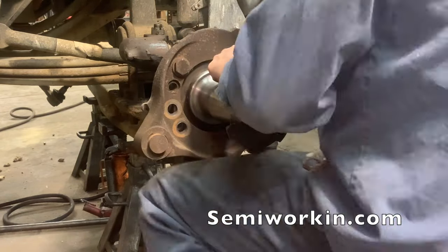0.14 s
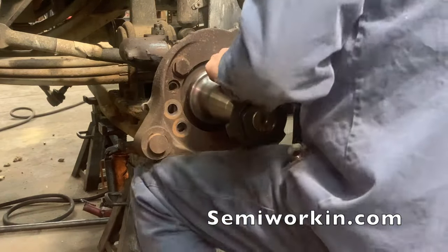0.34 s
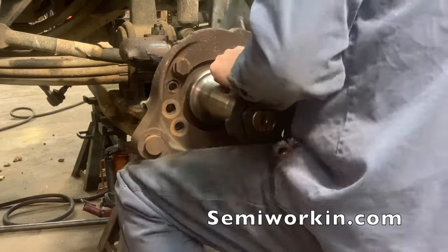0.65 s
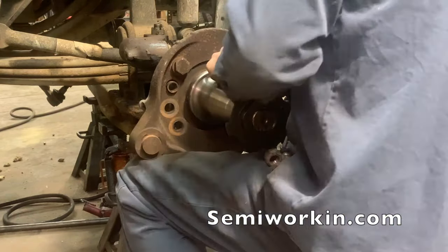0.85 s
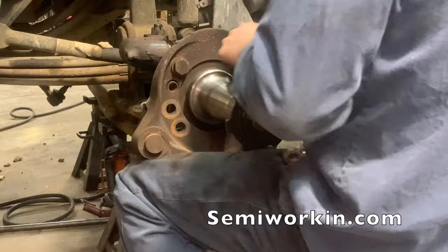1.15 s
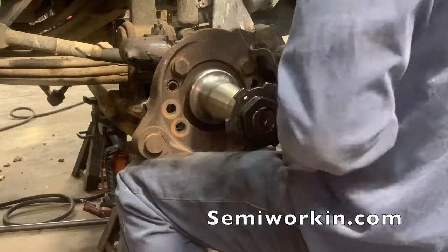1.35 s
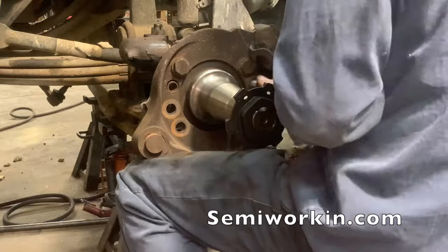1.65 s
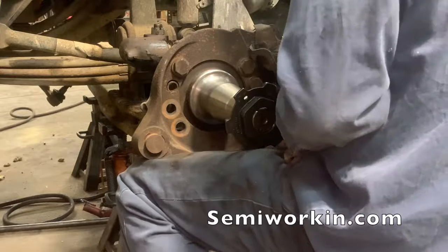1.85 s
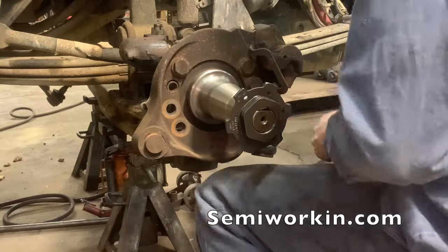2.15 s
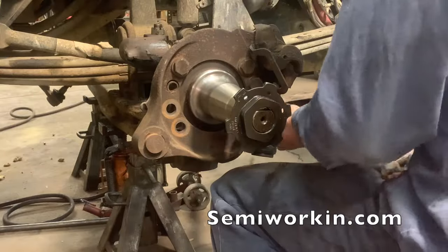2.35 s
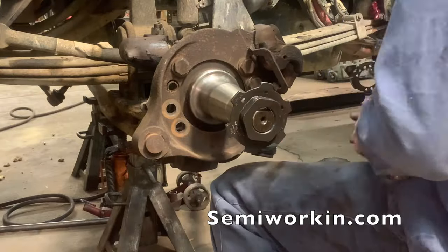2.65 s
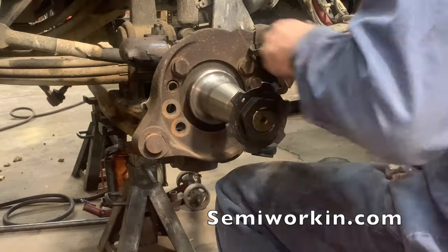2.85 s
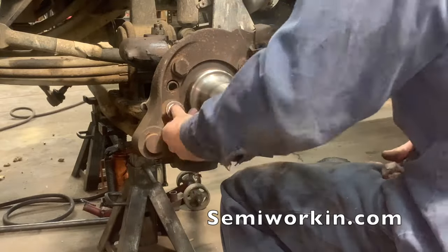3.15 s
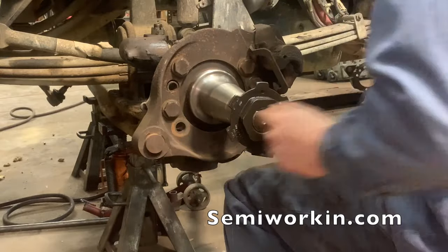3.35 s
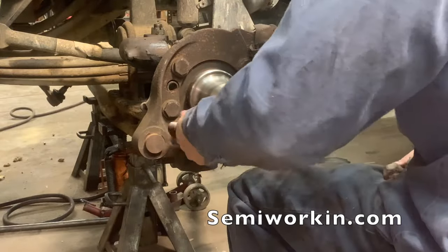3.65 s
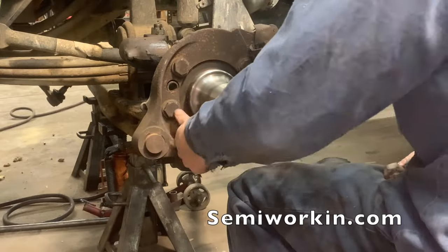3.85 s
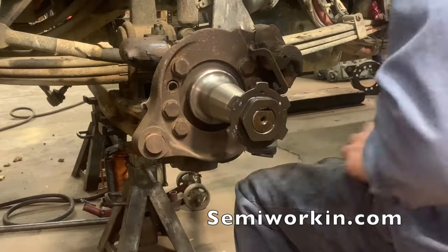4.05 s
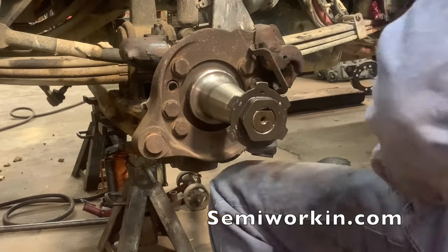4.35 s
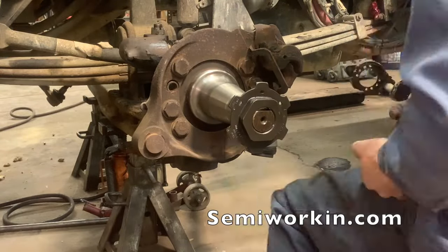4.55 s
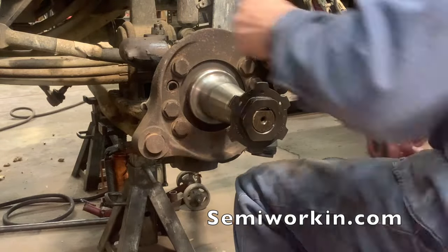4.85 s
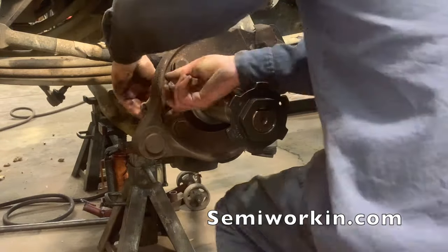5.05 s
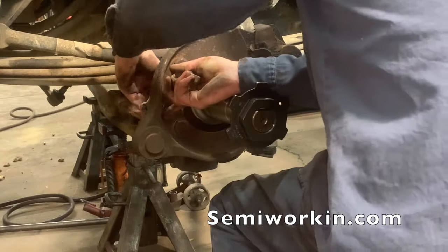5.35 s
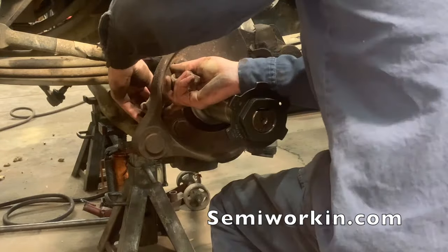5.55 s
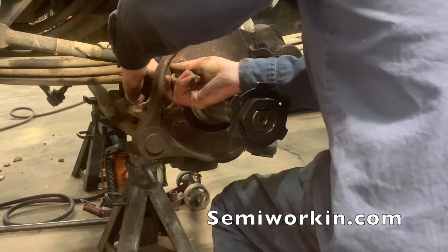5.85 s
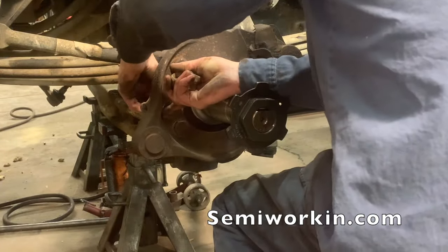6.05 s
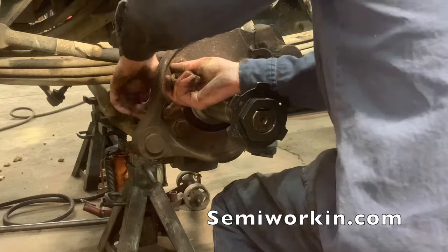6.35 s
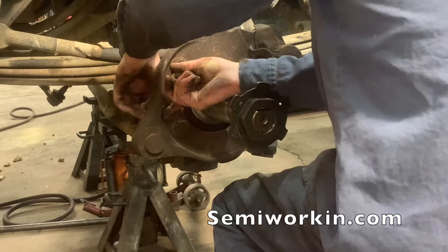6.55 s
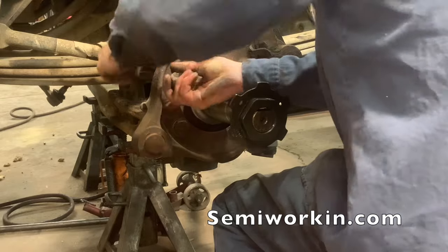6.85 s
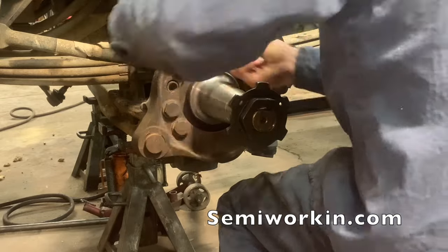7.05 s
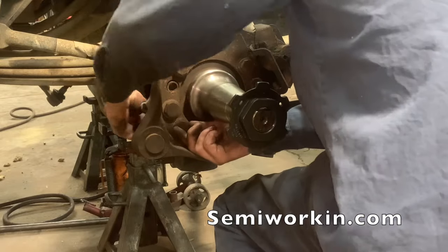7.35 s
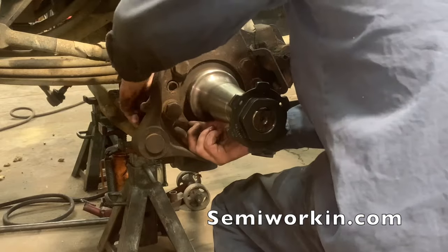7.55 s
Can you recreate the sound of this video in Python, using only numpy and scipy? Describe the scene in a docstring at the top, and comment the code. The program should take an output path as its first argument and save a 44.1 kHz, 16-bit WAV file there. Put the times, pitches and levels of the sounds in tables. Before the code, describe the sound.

A close stereo microphone in a workshop with a short, dense echo; deep wandering rumble, faint smooth hiss and tiny finger taps run throughout. At 0 seconds the tail of an air blip vanishes as steel drags and knocks dully until about 0.6. Bolts clink at 0.7 and snap at 0.8, with low axle booms and muffled clothing movement through 1.2. More bright clinks come around 1.7; a distant motor spins up from 1.75, steadies, and coasts down near 2.9. Another scrape at 2.0 leads to clinks around 2.4. From 2.9 to 3.9 bolts drop, slide and snap into holes, with slight wrench knocks at 3.6 and 3.95. Then it is quieter, with soft touches and a boom at 4.4. A short air-wrench burst hits at 4.9, with a soft rattle and a snap at 5.1. Faint thread ticking follows at 5.3-5.5 and 6.05-6.4. A weaker wrench burst with hammer blows comes at 7.1-7.2, then light touches to 7.5.

```python
"""A blip of air dies away at once while steel drags and knocks dully on a truck axle; bumps make the axle boom.
Loose bolts clink in the hand, and a distant motor speeds up and later coasts down.
Bolts then drop into the flange, sliding and snapping; an air impact wrench blips, threads tick and it blips again.
Contacts are short, soft-edged noise bursts ringing damped steel modes; the wrench is pulsed exhaust and blows.
Faint finger taps, a deep workshop rumble and a smooth hiss last throughout."""
import sys
import numpy as np
from scipy import signal
from scipy.fft import rfft, irfft, next_fast_len
from scipy.io import wavfile
from scipy.ndimage import uniform_filter1d

SR = 44100
rng = np.random.default_rng(int(sys.argv[2]) if len(sys.argv) > 2 else 0)


def put_to_file(sound):
    """Save the sound as 16-bit audio at rate SR, in the file named by the first command-line argument."""
    columns = np.atleast_2d(sound).T  # one column per channel
    safe = np.clip(columns, -1, 1)
    whole_steps = np.round(safe * 32767)
    wavfile.write(sys.argv[1], SR, whole_steps.astype(np.int16))


N = 339129
TIME = np.arange(N) / SR

# Levels of contacts are short-time peaks of their middle band; treble is relative to that.
# loose bolts meet in the hand: (time [s], level [dB], relative treble [dB])
HAND_CLINKS = [(0.699, -39, -3), (1.666, -32.5, -7), (1.676, -40, -1.5), (1.703, -35.5, -5.5),
               (1.722, -49, 8), (2.299, -48, -2), (2.327, -47.5, -18), (2.359, -50, -19.5),
               (2.389, -34, -9), (2.425, -36, -22), (2.437, -39.5, -7)]
# a bolt drops into its hole: (time [s], level [dB], relative treble [dB])
BOLT_SEATINGS = [(2.926, -38.5, 1), (3.168, -37.5, -17), (3.19, -45.5, 2.5), (3.578, -38.5, -3),
                 (3.738, -47.5, -4), (3.79, -51, -4), (3.913, -40, -3)]
# a bolt tip snaps against steel: (time [s], level [dB], relative treble [dB])
TIP_SNAPS = [(0.811, -39, 2), (0.821, -36.5, 8.5), (1.539, -52.5, 7), (2.453, -49.5, 6.5),
             (3.035, -40.5, 1), (5.114, -42, 2.5), (6.625, -58.5, 3.5)]
# dull knocks on the axle, before panning: (time [s], level [dB])
AXLE_KNOCKS = [(0.005, -49), (0.047, -60), (0.107, -57), (0.241, -58.5), (0.277, -63), (0.41, -71),
               (0.554, -67.5), (0.655, -56.5), (0.695, -59), (0.815, -54), (1.101, -68), (1.759, -67),
               (2.138, -56.5)]
# light touches of a bolt on the flange: (time [s], level [dB])
FLANGE_TOUCHES = [(1.14, -56.5), (1.348, -58), (1.476, -63.5), (2.176, -60), (4.176, -63), (4.296, -62),
                  (4.565, -63), (6.869, -56.5), (7.335, -61), (7.366, -58.5), (7.53, -59.5)]
# resonances of a bolt held loosely: (frequency [Hz], level [dB])
LOOSE_BOLT_MODES = [(1168, -7.5), (1976, -3.5), (2929, -8), (3198, 8), (3965, 5), (4075, 4), (4519, 3),
                    (5725, 3), (6345, -1), (7440, 2.5), (8716, 3), (9200, 3), (12700, -3.5)]
# resonances of a bolt in its hole: (frequency [Hz], level [dB])
SEATED_BOLT_MODES = [(1230, -18), (1920, 1.5), (2300, -4), (3250, -3.5), (3900, -0.5), (4060, 0), (4450, 0),
                     (5270, -5.5), (7335, 1), (7550, -2.5), (8500, -4), (11350, -9), (13500, -24)]
# resonances of a bolt tip: (frequency [Hz], level [dB])
BOLT_TIP_MODES = [(1230, -8), (2250, -3.5), (4450, -2), (6250, 0.5), (8620, -4.5), (10000, -7),
                  (12300, -10), (13650, 2), (14300, 2)]
# resonances of the axle: (frequency [Hz], level [dB])
AXLE_MODES = [(670, -15), (943, 3.5), (1055, 4), (1180, -4.5), (1370, -22), (1650, 1)]
# resonances of a bolt at its thread: (frequency [Hz], level [dB])
THREAD_MODES = [(1980, 5), (2250, 4), (3700, -7), (4400, -0.5)]
# after a seating or snap the bolt rocks back once, softer and duller
ROCK_S, ROCK_DB, ROCK_TREBLE_DB = 0.062, -19, -8.5
BOUNCE_S, BOUNCE_DB = 0.014, -7.5  # each knock bounces once


def handwork():
    """Impact excitation: bolts and axle ring in their damped modes at each clink, drop, snap, knock and tick."""
    seatings = rebounding(BOLT_SEATINGS, ROCK_S, ROCK_DB, ROCK_TREBLE_DB)
    snaps = rebounding(TIP_SNAPS, ROCK_S, ROCK_DB, ROCK_TREBLE_DB)
    bounces = [(s + BOUNCE_S, db + BOUNCE_DB) for s, db in AXLE_KNOCKS]
    knocks = alike(AXLE_KNOCKS + bounces, treble_db=-4)
    ticks = alike(FLANGE_TOUCHES + thread_ticks() + fidgets(), treble_db=-9)
    thuds = contacts(knocks, AXLE_MODES, bass_db=12, rise_t60=0.041, fall_t60=0.035,
                     ring_db=-13.5, ring_t60=0.034)
    return (contacts(HAND_CLINKS, LOOSE_BOLT_MODES, bass_db=-15.5, rise_t60=0.045, fall_t60=0.053,
                     ring_db=-14.0, ring_t60=0.031)
            + contacts(seatings, SEATED_BOLT_MODES, bass_db=-14, rise_t60=0.034, fall_t60=0.062,
                       ring_db=-8.5, ring_t60=0.013)
            + contacts(snaps, BOLT_TIP_MODES, bass_db=-12.5, rise_t60=0.037, fall_t60=0.036,
                       ring_db=-11.0, ring_t60=0.012)
            + to_right(thuds, pan_db=3, lag_s=0.00013)
            + contacts(ticks, THREAD_MODES, bass_db=-7, rise_t60=0.042, fall_t60=0.046,
                       ring_db=-13.5, ring_t60=0.0086))


# fingers spin a bolt in: (start [s], end [s], time between ticks [s], mean tick level [dB])
THREAD_TURNS = [(5.281, 5.531, .054, -66.5), (6.052, 6.42, .082, -67)]
TICK_SCATTER_DB = 3


def thread_ticks():
    """Periodic excitation: a turning thread catches at an even pace, each catch with its own strength."""
    return [(s, db + TICK_SCATTER_DB * rng.standard_normal())
            for start, end, period, db in THREAD_TURNS for s in np.arange(start, end, period)]


FIDGETS, FIDGET_DB = 45, -73  # number of taps, mean level


def fidgets():
    """Random point process: faint taps of fingers and sleeves scatter evenly over the whole scene."""
    return [(where * N / SR, FIDGET_DB + 5 * (strength - 0.5))
            for where, strength in rng.random((int(FIDGETS), 2))]


# Levels of rubbing are gains of the push, before slip unevenness and the 6 dB cut that all rubbing shares.
# steel dragged over steel: (start [s], end [s], level at start [dB], level at end [dB])
STEEL_SCRAPES = [(0, .29, -53, -57), (.3, .55, -63, -67), (1.94, 2.17, -57.5, -53)]
# a soft rattle after the second blip: (start [s], end [s], level at start [dB], level at end [dB])
SOFT_RATTLE = [(4.98, 5.3, -54, -61.5)]
# a bolt shank slides in its hole: (start [s], end [s], level at start [dB], level at end [dB])
SHANK_SLIDES = [(3.07, 3.21, -58, -53), (3.67, 3.83, -68, -53)]
GRATE_DB = -77.5  # push of the grating threads, before its long edges


def scraping():
    """Friction excitation: uneven slips ring the parts as steel drags, slides and grates in its thread, and a
    soft rattle follows the second blip."""
    turning = [(start, end, GRATE_DB, GRATE_DB) for start, end, _, _ in THREAD_TURNS]
    rattle_modes = [(960, 2), (1070, -4), (1170, -10)]  # (frequency [Hz], level [dB])
    drag = rub(stroke(STEEL_SCRAPES, edge_s=0.021), AXLE_MODES, top_hz=2110, ring_db=-17, uneven_db=4.0)
    rattle = rub(stroke(SOFT_RATTLE, edge_s=0.06), rattle_modes, top_hz=1400, ring_db=-10, uneven_db=3.0)
    sliding = rub(stroke(SHANK_SLIDES, edge_s=0.025), SEATED_BOLT_MODES,
                  top_hz=3480, ring_db=-17.5, uneven_db=3.5)
    # the edges outlast the turns, so the grating only swells and sinks
    grating = rub(stroke(turning, edge_s=0.6), THREAD_MODES, top_hz=4000, ring_db=-6.0, uneven_db=5.0)
    balance_db = np.array([[-1.2], [1.2]])
    return (drag + rattle + sliding + grating) * undb(-6 + balance_db)


# trigger pulls, before panning: (time [s], time held [s], level [dB], run-down t60 [s])
TRIGGER_PULLS = [(-0.02, 0.027, -52, 0.45), (4.894, 0.054, -40.5, .3), (7.076, 0.076, -48, 0.09)]
# spectrum of the vented air: (frequency [Hz], level [dB])
EXHAUST_COLOUR = [(400, -11.5), (740, -24), (980, -2), (1290, -2.5), (1930, -18.5), (2700, -14),
                  (3200, -24), (4950, -9), (6400, -18), (8300, -14.5), (12100, -9), (15500, -25)]
# the hammer of the wrench strikes, before panning: (time [s], level [dB])
WRENCH_BLOWS = [(3.568, -51.5), (3.953, -49.5), (4.906, -46.5), (5.0, -56), (7.082, -49.5), (7.132, -52),
                (7.152, -51.5), (7.209, -46)]
# resonances of the wrench: (frequency [Hz], level [dB])
WRENCH_MODES = [(1040, 0), (1230, 11), (1310, 11.5), (1450, -7), (5020, -2.5), (8400, 2), (12000, 5)]
PUFF_HZ = 125  # mean rate of the air puffs


def wrench():
    """Amplitude-modulated flow noise: rotor vanes vent air in puffs; hammer blows ring the body, to the right."""
    flow = sum(undb(db) * np.clip((TIME - s) / 0.02, 0, 1) * fade(TIME - s - held, t60)
               for s, held, db, t60 in TRIGGER_PULLS)
    turn = np.cumsum(PUFF_HZ * (1 + 0.109 * walk(60))) / SR
    puffs = 1 + 0.1 * np.cos(2 * np.pi * turn)
    exhaust = noise(EXHAUST_COLOUR, 0.32) * flow * puffs
    blows = contacts(alike(WRENCH_BLOWS, treble_db=6.0), WRENCH_MODES, bass_db=6.5,
                     rise_t60=0.036, fall_t60=0.035, ring_db=-11.0, ring_t60=0.017)
    return to_right(exhaust + blows, pan_db=2.5, lag_s=0.00015)


# bumps of arm and knee on the axle: (time [s], level before envelope and balance [dB], frequency [Hz])
AXLE_BUMPS = [(0.561, -31.5, 119.3), (0.66, -30, 125.6), (0.87, -32, 113.4), (1.148, -28.5, 147),
              (1.724, -30, 111), (3.776, -35.5, 137), (4.359, -29.5, 132.5), (6.65, -40, 187)]
# one low mode of the flange: (time [s], frequency [Hz], level before envelope and balance [dB], t60 [s])
FLANGE_HUM = (3.168, 400, -45, .24)


def bumps():
    """Damped resonance: soft, heavy pushes make the axle boom, and one bolt sets the flange humming."""
    out, t = np.zeros((2, N)), np.arange(SR // 3) / SR
    balance = undb(np.array([[-0.6], [0.6]]))
    for s, db, hz in AXLE_BUMPS:
        boom = (1 - fade(t, 0.038)) * fade(t, 0.15) * np.sin(2 * np.pi * hz * t)
        add(out, s - 0.004, undb(db) * boom * balance)
    s, hz, db, t60 = FLANGE_HUM
    hum = (1 - fade(t, 0.018)) * fade(t, t60) * np.sin(2 * np.pi * hz * t)
    add(out, s, undb(db) * hum * balance)
    return out


# the worker shifts his weight: (time [s], time to fall to 1/e [s], bass level [dB], low-mid level [dB])
WEIGHT_SHIFTS = [(0.01, 0.053, -44.5, -43), (0.167, 0.14, -60, -54.5), (0.726, 0.2, -46, -55.5),
                 (1.16, 0.037, -43.5, -50.5), (2.086, 0.069, -56, -51.5), (3.792, .06, -58, -55)]
# spectrum of muffled low-mid noise: (frequency [Hz], level [dB])
LOW_MID_COLOUR = [(170, 3.5), (240, 2), (330, -4), (450, -7.5), (700, -22), (1200, -30.5)]


def shifting():
    """Low-passed friction noise: heavy clothes and limbs make a muffled swell whenever the worker moves."""
    swells = [(np.exp(-((TIME - s) / half) ** 2), bass_db, low_mid_db)
              for s, half, bass_db, low_mid_db in WEIGHT_SHIFTS]
    bass_gain = sum(swell * undb(db) for swell, db, _ in swells)
    low_mid_gain = sum(swell * undb(db) for swell, _, db in swells)
    bass = noise([(90, -5), (135, 0), (200, -8)], 0.95) * bass_gain
    return bass + noise(LOW_MID_COLOUR, 0.84) * low_mid_gain


# when the motor is heard, before flutter: (start [s], end [s], level at start [dB], level at end [dB])
MOTOR_PASSAGES = [(1.78, 2.36, -44.5, -48), (2.8, 2.99, -51.5, -48.5)]
MOTOR_ON_S, MOTOR_OFF_S = 1.74, 2.84
# pitch of the third order; the spin-up is a time constant
START_HZ, TOP_SPEED_HZ, SPIN_UP_S, COAST_HZ_PER_S = 125, 210, 0.15, 196


def motor():
    """Orders of rotation: the second and third come through the walls, rising exponentially, falling linearly."""
    lag = np.exp(-np.maximum(TIME - MOTOR_ON_S, 0) / SPIN_UP_S)
    coast = COAST_HZ_PER_S * np.maximum(TIME - MOTOR_OFF_S, 0)
    hz = np.maximum(TOP_SPEED_HZ - (TOP_SPEED_HZ - START_HZ) * lag - coast, 0)
    phase = 2 * np.pi * np.cumsum(hz * (1 + 0.0062 * walk(24.53))) / SR
    third = np.sin(phase)
    second = np.sin(phase * 2 / 3)
    flutter = undb(2 * walk(18))
    return stroke(MOTOR_PASSAGES, edge_s=0.06) * flutter * (third + undb(-9.5) * second)


# spectrum of the rumble: (frequency [Hz], level [dB])
RUMBLE_COLOUR = [(25, -27.5), (54, -9.5), (86, -5.5), (108, -1), (126, 1.5), (188, -8), (257, -23),
                 (400, -27)]
# spectrum of the hiss: (frequency [Hz], level [dB])
AIR_COLOUR = [(600, -5), (1200, -13), (2200, -12.5), (3600, -14.5), (6000, -7.5), (8000, -8.5), (9100, 1),
              (10500, -3.5), (13500, -0.5), (15500, -4.5)]
RUMBLE_DB, LOW_MID_DB, AIR_DB = -50.5, -61.5, -68  # mean levels, rumble and low-mid before balance


def workshop():
    """Stationary coloured noise: a deep, wandering rumble under a smooth, faint hiss."""
    bass = noise(RUMBLE_COLOUR, 0.96) * undb(RUMBLE_DB + 0.3 * walk(3))
    low_mid = noise(LOW_MID_COLOUR, 0.84) * undb(LOW_MID_DB + 0.51 * walk(5))
    hiss = noise(AIR_COLOUR, 0.24) * undb(AIR_DB + 0.12 * walk(7.1))
    return (bass + low_mid) * undb(np.array([[-0.9], [0.9]])) + hiss


def room(x, wet_db, t60):
    """Diffuse reverberation: dense echoes from the chassis and the floor build up and die quickly."""
    t = np.arange(SR) / SR
    tail = pair(SR, 0.065) * (1 - fade(t, 0.04)) * fade(t, t60)
    tail = tail / np.sqrt(np.sum(tail[0] ** 2))
    return x + undb(wet_db) * signal.fftconvolve(x, tail, axes=1)[:, :N]


def contacts(rows, modes, bass_db, rise_t60, fall_t60, ring_db, ring_t60):
    """Soft-edged contact: a short noise burst rises and falls around each hit and rings the part."""
    out, t = np.zeros((2, N)), np.arange(8192) / SR - 0.03
    envelope = fade(-t, rise_t60) * fade(t, fall_t60)
    for s, level_db, treble_db in rows:
        burst = envelope * rng.standard_normal(len(t)) * np.exp(0.71 * rng.standard_normal(len(t)))
        body = response(modes, ring_db, ring_t60)
        blow = signal.fftconvolve(burst[None], body, axes=1)[:, :len(t)]
        # the ring builds up, so the sound peaks just after the burst does
        add(out, s + t[0] - 0.0015, voiced(blow, level_db + np.array([bass_db, 0, treble_db])))
    return out


def response(modes, ring_db, t60):
    """Modal impulse response: a short noise crack, and resonances that the hand damps quickly."""
    t = np.arange(8192) / SR
    hz, db = np.transpose(modes)
    # each contact weights the modes anew, and each mode reaches the two channels with its own phase
    weight = undb(db + 2 * rng.standard_normal(len(hz)))
    size = weight * np.exp(1.1j * rng.standard_normal((2, len(hz))))
    ring = (size @ np.exp(2j * np.pi * hz[:, None] * t)).imag
    crack = pair(len(t), 0.4) * fade(t, 0.012)
    return crack + undb(ring_db) * ring * fade(t, t60)


def voiced(y, levels_db):
    """Band-wise loudness: the bass, middle and treble of a blow are set to their short-time peak levels."""
    size = y.shape[1]
    f = np.fft.rfftfreq(size, 1 / SR)
    # high-pass masks: (edge [Hz], steepness)
    above = [1 - 1 / (1 + (f / edge) ** order) for edge, order in [(400, 4), (1700, 12), (7500, 16)]]
    masks = [above[0] - above[1], above[1] - above[2], above[2]]
    out, spectrum = 0, rfft(y)
    for mask, db in zip(masks, levels_db):
        band = irfft(spectrum * mask, size)
        peak = np.sqrt(uniform_filter1d(band.mean(axis=0) ** 2, size=256).max())
        out = out + band * undb(db) / peak
    return out


def rub(push, modes, top_hz, ring_db, uneven_db):
    """Stochastic friction: uneven slips, as strong as the push, ring a part."""
    slips = rng.standard_normal(N) * undb(uneven_db * (walk(80) + 0.69 * walk(25))) * push
    contact = signal.butter(1, [600, np.clip(top_hz, 900, 9000)], "bandpass", fs=SR, output="sos")
    body = signal.sosfilt(contact, response(modes, ring_db, t60=0.021))
    body = body / np.linalg.norm(body.mean(axis=0))
    return signal.oaconvolve(slips[None], body, axes=1)[:, :N]


def stroke(rows, edge_s):
    """Force envelope: the gain of pushes that set in, grow or ease evenly in dB, and let go."""
    return sum(undb(np.interp(TIME, [start, end], [start_db, end_db]))
               * np.clip(np.minimum(TIME - start, end - TIME) / edge_s + 0.5, 0, 1)
               for start, end, start_db, end_db in rows)


def rebounding(rows, after_s, softer_db, treble_change_db):
    """Inelastic rebound: each contact is followed by a weaker one."""
    rebounds = [(s + after_s, db + softer_db, treble_db + treble_change_db) for s, db, treble_db in rows]
    return list(rows) + rebounds


def alike(rows, treble_db):
    """Common spectral balance: contacts (time [s], level [dB]) share one brightness."""
    return [(s, db, treble_db) for s, db in rows]


def to_right(x, pan_db, lag_s):
    """Level and time difference: a sound from the right reaches the left channel later and weaker."""
    left = np.pad(x[0], (int(abs(lag_s) * SR), 0))[:N]
    return np.array([left, x[1]]) * undb(np.array([[-pan_db], [pan_db]]) / 2)


def noise(colour, likeness):
    """Spectral shaping: stereo noise of a given spectrum, whose mid has an rms of 1."""
    hz, db = np.transpose(colour)
    size = next_fast_len(N)
    f = np.maximum(np.fft.rfftfreq(size, 1 / SR), 1)
    skirts = np.minimum(f / hz[0], 1) ** 3 * np.minimum(hz[-1] / f, 1) ** 3
    gain = undb(np.interp(np.log(f), np.log(hz), db)) * skirts
    y = irfft(rfft(pair(size, likeness)) * gain, size)[:, :N]
    return y / y.mean(axis=0).std()


def pair(size, likeness):
    """Partial coherence: white noise for two channels that share a part of their power."""
    c = np.clip(likeness, 0, 1)
    return np.sqrt(c) * rng.standard_normal(size) + np.sqrt(1 - c) * rng.standard_normal((2, size))


def walk(rate):
    """Band-limited fluctuation: smoothed random steps, rate per second, with a spread near 1."""
    k = max(int(SR / rate), 1)
    steps = np.repeat(rng.standard_normal(N // k + 1), k)
    return 1.45 * uniform_filter1d(steps, k)[:N]


def fade(t, t60):
    """Exponential damping: decay by 60 dB in t60 seconds."""
    return np.exp(-np.log(1000) * np.maximum(t, 0) / t60)


def undb(db):
    """Logarithmic level: decibels to amplitude gain."""
    return 10 ** (np.asarray(db) / 20)


def add(out, s, y):
    """Superposition: mix y into out from time s on."""
    i = int(s * SR)
    a, b = max(i, 0), min(i + y.shape[1], N)
    out[:, a:b] += y[:, a - i:b - i]


def scene():
    """Superposition: hand work and wrench in the room, over the background."""
    hands = room(handwork() + scraping(), wet_db=-7.0, t60=0.15)
    tool = room(wrench(), wet_db=-8.5, t60=0.13)
    return hands + tool + bumps() + shifting() + motor() + workshop()


TOP_HZ = 15600


def record(dry):
    """Band limitation: the recorder cuts the top steeply with an elliptic low-pass."""
    return signal.sosfilt(signal.ellip(12, 0.2, 80, TOP_HZ, fs=SR, output="sos"), dry)


dry = scene()
out = record(dry)
put_to_file(out)
```